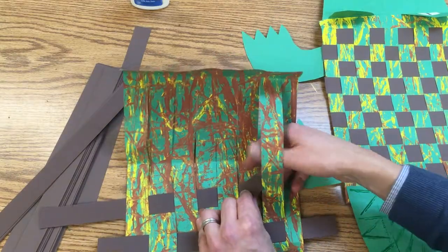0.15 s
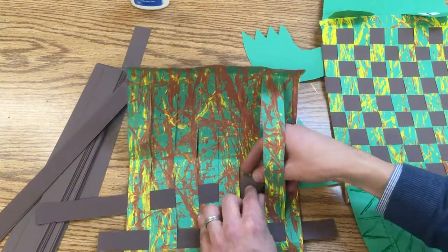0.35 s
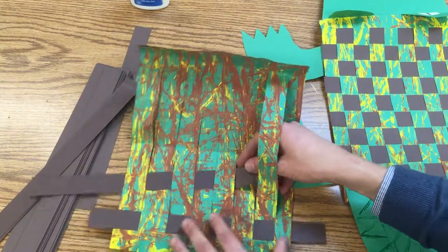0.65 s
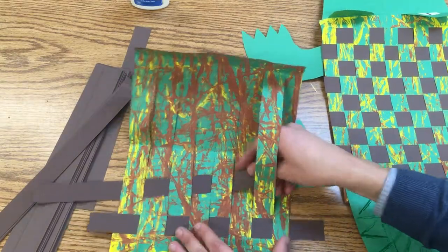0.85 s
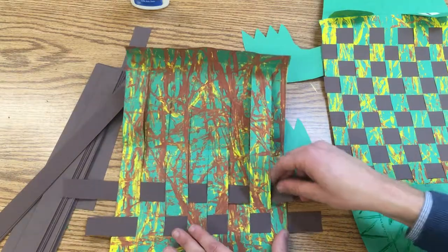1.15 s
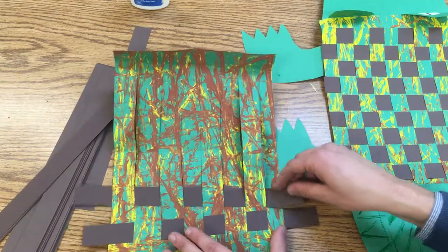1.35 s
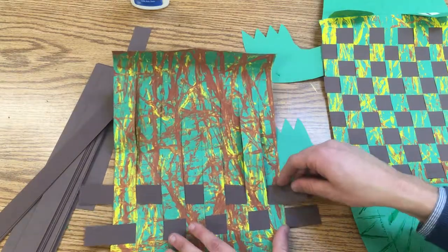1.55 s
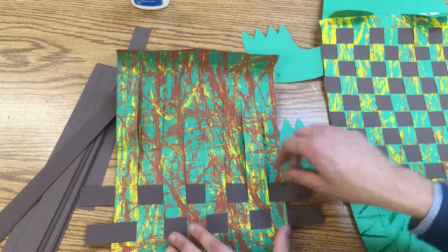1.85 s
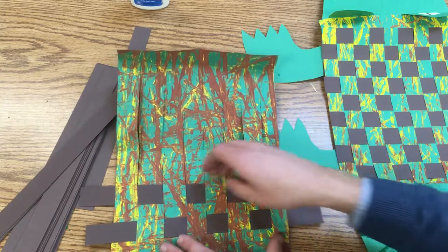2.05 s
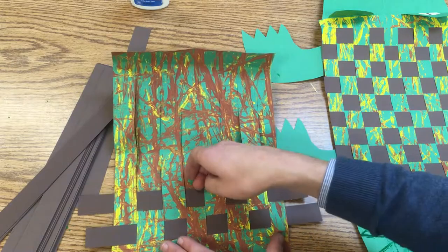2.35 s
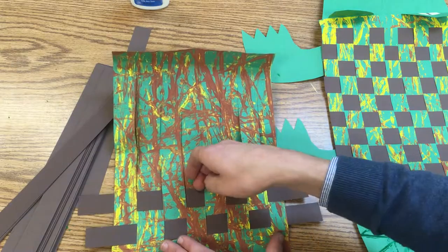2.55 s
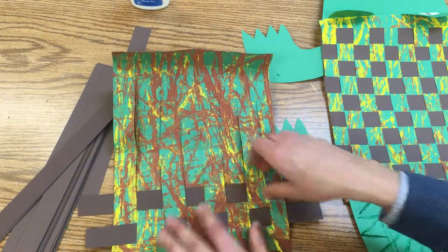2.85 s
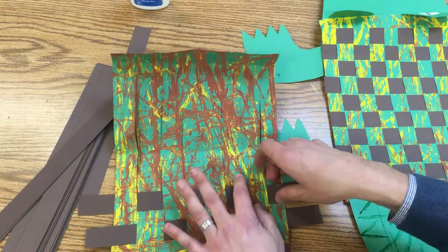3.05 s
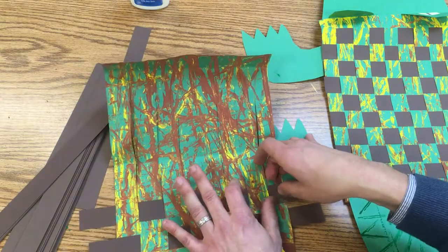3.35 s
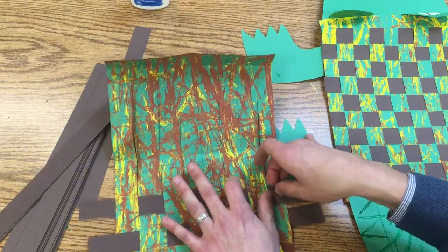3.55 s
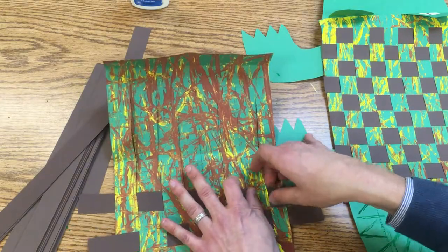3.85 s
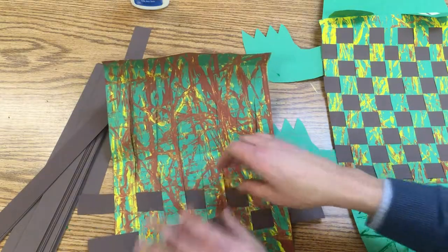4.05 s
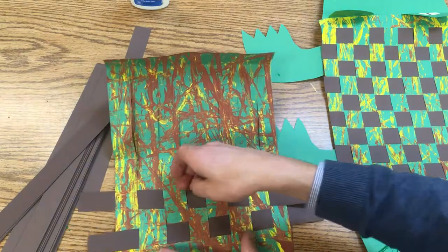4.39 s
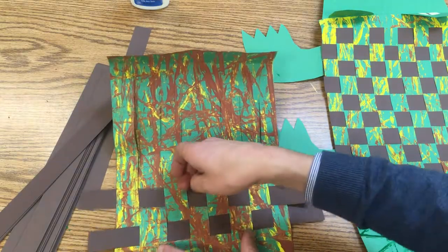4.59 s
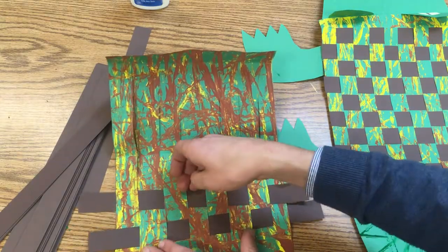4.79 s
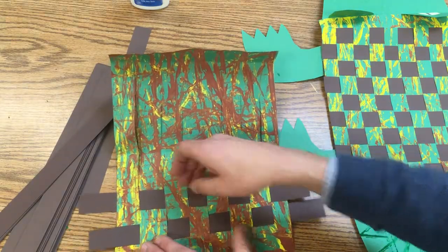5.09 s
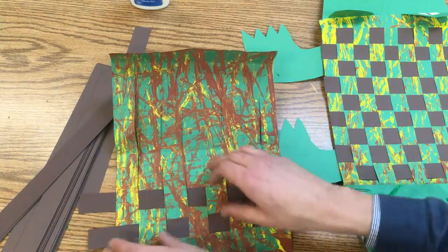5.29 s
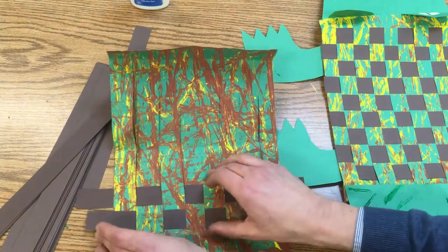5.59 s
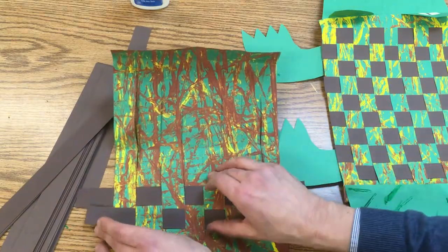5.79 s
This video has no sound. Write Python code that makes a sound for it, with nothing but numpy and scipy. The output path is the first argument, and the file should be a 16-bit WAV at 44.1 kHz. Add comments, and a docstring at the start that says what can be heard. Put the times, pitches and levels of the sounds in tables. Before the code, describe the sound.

A close, dry, mono sound of stiff construction paper being woven on a wooden table in a quiet room. A faint ventilation rumble and slightly wavering low mains hum run throughout. Bright, hissy slides begin at once, with a sharp snap at 0.1 s. Around 0.7 s comes the loudest moment, a tight cluster of crackling snaps and hollow papery taps, followed by strong continuous scraping from about 0.8 to 1.45 s. Shorter rubs follow to 1.8 s, then a lull. Light taps at 2.1 s lead to brief scratchy shuffles until 2.8 s. From 2.9 to 3.9 s softer rubbing returns, with taps and a crisp snap near 3.17 s. After a short pause, taps, ticks and scrapes cluster at 4.2-4.8 s. A snap sounds at 4.9 s, a small tap at 5.15 s, then a snap and longer rustle at 5.5 s, fading into small shuffles and a final tap at 5.9 s.

```python
"""Hands thread strips of stiff paper through a slit sheet on a wooden table, close under a small microphone.
Paper slides on paper: fibres catch and let go in tiny clicks that add up to hiss and a duller sheet scrape.
Creases snap as short noise bursts; taps ring the air pocket under the sheet in a few damped modes.
Below lie a ventilation rumble of shaped noise and duct resonances, and a slightly wavering mains hum."""
import sys
import numpy as np
from scipy import signal
from scipy.fft import rfft, irfft
from scipy.io import wavfile

SR = 44100
rng = np.random.default_rng(int(sys.argv[2]) if len(sys.argv) > 2 else 0)


def to_wav(sig):
    """Store sig (one row per channel, or 1-D mono) as 16-bit WAV at the path in sys.argv[1].

    Samples outside -1..1 are clipped; the rate is SR.
    """
    pcm = np.clip(np.atleast_2d(sig), -1, 1) * 32767
    pcm = np.round(pcm).astype(np.int16)
    wavfile.write(sys.argv[1], SR, pcm.T)  # frames by channels


def field_ratio(decibels):
    """Amplitude ratio for a level in dB (20 dB per decade); scalars and array-likes work."""
    return 10 ** (np.asarray(decibels, dtype=float) / 20)


N = 261504

# bright spectrum of slipping paper fibres: hz, relative_level_db
FIBRE_SPECTRUM = [(2000, -18.5), (3500, -11.5), (5800, 0), (7000, -3), (8800, 2), (12000, 0.5), (16000, -2)]


def rms_one(x):
    """Scale to rms 1."""
    return x / np.sqrt(np.mean(x ** 2) + 1e-20)


def drift(rate_hz):
    """Slow chance wandering, rms 1: noise through two equal one-pole low-passes at rate_hz."""
    r = np.exp(-2 * np.pi * rate_hz / SR)
    noise = rng.standard_normal(N + SR)
    return rms_one(signal.lfilter([1], [1, -2 * r, r * r], noise)[SR:])


def colour(x, spectrum):
    """Shape x by a (Hz, dB) spectrum with a minimum-phase response, so nothing sounds early."""
    size = 8192
    hz = np.maximum(np.fft.rfftfreq(size, 1 / SR), 1)
    hz_points, level_db = np.transpose(spectrum)
    gain = field_ratio(np.interp(np.log(hz), np.log(hz_points), level_db))
    # folding the cepstrum onto positive times makes the phase minimal
    cepstrum = irfft(np.log(gain))
    cepstrum[1:size // 2] *= 2
    cepstrum[size // 2 + 1:] = 0
    response = irfft(np.exp(rfft(cepstrum)))
    response = response / np.sqrt(np.sum(response ** 2))
    return signal.fftconvolve(x, response)[:len(x)]


def resonance(x, hz, width_hz):
    """Two-pole band-pass, gain 1 on top."""
    r = np.exp(-np.pi * width_hz / SR)
    zeros = np.array([1, 0, -1]) * (1 - r * r) / 2
    poles = [1, -2 * r * np.cos(2 * np.pi * hz / SR), r * r]
    return signal.lfilter(zeros, poles, x)


def room_tone():
    """Broad rumble and hiss, duct resonances rung by turbulence, and a slightly wavering mains hum."""
    # room air and microphone hiss: hz, relative_level_db
    air_spectrum = [(20, -12), (40, -5), (60, -7), (130, -4.5), (200, -15.5), (280, -22), (400, -27),
                    (570, -39.5), (900, -23.5), (1200, -44), (1600, -32.5), (3000, -39.5), (5000, -35),
                    (8000, -33.5), (16000, -31.5)]
    # ventilation duct resonances: hz, width_hz, rms_level_db
    duct_modes = [(55.3, 18, -48.5), (79, 32, -51), (159, 30.6, -51.5), (262.4, 14.2, -58),
                  (383.4, 8.1, -66.5)]
    hum_hz, hum_rms_db = 119.8, -46.5
    out = field_ratio(-47.5) * rms_one(colour(rng.standard_normal(N + SR), air_spectrum)[SR:])
    for hz, width_hz, level_db in duct_modes:
        turbulence = rng.standard_normal(N + SR)
        out += field_ratio(level_db) * rms_one(resonance(turbulence, hz, width_hz)[SR:])
    phase = 2 * np.pi * hum_hz * np.arange(N) / SR + 0.38 * drift(1.0)
    hum_level = field_ratio(hum_rms_db + 0.24 * drift(14.0))
    return out + hum_level * np.sqrt(2) * np.sin(phase)


def stroke_levels():
    """Hiss and flex levels in dB: strokes break loose, catch fast, drift in level, let go; powers add."""
    # strokes of paper over paper: start_s, length_s, hiss_start_db, hiss_end_db, flex_over_hiss_db
    strokes = [(0.007, 0.063, -27.5, -34.6, -14), (0.13, 0.045, -32, -41, -17),
               (0.172, 0.13, -36.5, -26, -11), (0.318, 0.15, -37.5, -39.5, -6.5),
               (0.474, 0.12, -43.5, -35, -8.5), (0.601, 0.07, -40.0, -31.5, -6.5),
               (0.678, 0.15, -30, -52, -1), (0.81, 0.064, -41.5, -25.5, -12), (0.881, 0.14, -26, -25.5, -9),
               (1.018, 0.11, -21.0, -27.5, -8), (1.133, 0.048, -34.4, -29, -6),
               (1.198, 0.24, -26.5, -28.5, -10.5), (1.473, 0.059, -48, -56, -5),
               (1.532, 0.13, -27.5, -42, -12), (1.683, 0.067, -35, -42.5, -11.9),
               (1.781, 0.053, -34, -36, -10), (2.142, 0.063, -44.5, -37.5, -6.5),
               (2.215, 0.016, -37, -29.5, -12.5), (2.244, 0.068, -37, -45.5, -4),
               (2.322, 0.033, -57, -22.5, -10.5), (2.37, 0.0074, -24, -59, -8.8),
               (2.394, 0.15, -62, -47, -6.5), (2.6, 0.044, -53, -39, -8.0), (2.634, 0.046, -46, -48, -9),
               (2.703, 0.11, -49.5, -48.5, -8), (2.882, 0.27, -31.5, -63.5, -6.8),
               (3.047, 0.11, -32.5, -42.5, -11.5), (3.177, 0.084, -32.5, -40.5, -11.5),
               (3.273, 0.14, -37.5, -37, -14), (3.424, 0.21, -41.5, -30, -14.0),
               (3.601, 0.079, -30, -38.5, -16), (3.691, 0.285, -42, -44.0, -12),
               (4.254, 0.058, -30.8, -30, -12), (4.323, 0.022, -29.5, -66, -12),
               (4.358, 0.21, -39.5, -46.5, -5.5), (4.605, 0.019, -79, -31.5, -4.3),
               (4.639, 0.052, -25.5, -52, -6.5), (4.689, 0.036, -30, -38, -7.1),
               (4.74, 0.13, -38.5, -44.5, -10.5), (4.913, 0.069, -36, -50, -12.5),
               (5.034, 0.049, -52.5, -32.5, -12), (5.058, 0.097, -68, -34.5, -6.5),
               (5.353, 0.11, -46.5, -42.4, -7), (5.452, 0.24, -30.5, -46.5, -8.5),
               (5.656, 0.11, -48.5, -31.5, -9.6), (5.794, 0.12, -53, -50.5, -9)]
    # brief jerks where the strip sticks and lurches on: start_s, hiss_db, flex_over_hiss_db
    jerks = [(0.095, -31, -9.5), (0.295, -47, 3), (0.453, -39.5, -3.5), (0.591, -39.5, -2.5),
             (0.695, -25, -1), (0.75, -46, -12), (1.428, -27, -13), (2.259, -33.5, -13),
             (2.453, -43, -14.7), (2.95, -35.5, -2.5), (2.98, -54, 7), (3.225, -32, -12.5),
             (3.307, -36, -13), (3.385, -37, -9), (3.495, -37, -21), (3.914, -38, -17), (3.976, -47, -3.5),
             (4.462, -41.5, -10), (4.535, -45, -6), (4.768, -47, -2.8), (5.371, -42, -9.7),
             (5.599, -38.5, -4), (5.694, -37.5, -7), (5.892, -51, -8)]
    jerk_s = 0.011
    catch_db_per_s, release_db_per_s = 1395, 692
    breakaway_s = 0.0085   # the paper holds still until this long before the start time
    t = np.arange(0, N + 64, 32) / SR
    power = 1e-9
    moves = list(strokes) + [(start, jerk_s, db, db, flex_db) for start, db, flex_db in jerks]
    for start, length, start_db, end_db, flex_db in moves:
        end = start + max(length, 1 / SR)
        level_db = np.interp(t, [start, end], [start_db, end_db])
        level_db -= catch_db_per_s * np.maximum(start - t, 0)
        level_db -= release_db_per_s * np.maximum(t - end, 0)
        hiss_and_flex_db = np.maximum(level_db, -150) + [[0], [flex_db]]
        loose = t > start - breakaway_s
        power = power + loose * field_ratio(2 * hiss_and_flex_db)
    return [np.interp(np.arange(N) / SR, t, 10 * np.log10(p)) for p in power]


def friction(clumps, per_s, spread_db):
    """Tiny stick-slip clicks of uneven size, louder within clumps; rms 1."""
    sizes = field_ratio(spread_db * np.minimum(rng.exponential(1, N), 5)) * rng.choice([-1, 1], N)
    caught = rng.random(N) < per_s / SR
    return rms_one(sizes * caught * clumps)


def patchy(x, edges_hz, patchy_db, rate_hz):
    """The bent sheet radiates unevenly: each band swells and fades on its own."""
    out = np.zeros(N)
    for edge in zip(edges_hz, edges_hz[1:]):
        band = signal.butter(1, edge, "band", fs=SR, output="sos")
        out += signal.sosfilt(band, x) * field_ratio(patchy_db * drift(rate_hz))
    return rms_one(out)


def sliding():
    """Fibres give a bright hiss with sparse ticks; the flexing sheet gives a duller scrape."""
    # duller spectrum of the flexing sheet: hz, relative_level_db
    sheet_spectrum = [(210, -38), (350, -20), (512, -16), (1110, -10.5), (1260, -11), (1460, -11),
                      (1660, -8), (3430, -4), (6000, -12), (7800, -10), (13200, -120)]
    # an arched strip traps air and colours the slide for a while: start_s, end_s, hz, top_gain_db
    arches = [(0.253, 0.308, 5100, 5.5), (0.967, 1.196, 3560, 2.5), (1.292, 1.444, 5570, -1),
              (2.167, 2.343, 2860, -3), (2.194, 2.27, 10800, 8), (2.705, 2.837, 2860, 10),
              (2.864, 2.924, 2620, 7.5), (2.872, 2.898, 5400, 10), (4.22, 4.322, 2500, 9.5),
              (4.257, 4.433, 8400, 3), (4.39, 4.524, 2730, 7), (4.674, 4.73, 3020, 13),
              (5.453, 5.598, 2900, 1), (0.84, 1.175, 4900, 1.5), (2.87, 2.893, 4000, 1)]
    hiss_db, flex_db = stroke_levels()
    # grip varies along the fibres and with the hand
    clumps = field_ratio(1.5 * drift(97) + 1.1 * drift(30))
    ticks = friction(clumps, 250, spread_db=2.5)
    fibres = friction(clumps, 16000, spread_db=2.5) + field_ratio(-11) * ticks
    hiss_edges_hz = np.geomspace(3000, 19000, num=9)
    hiss = patchy(colour(fibres, FIBRE_SPECTRUM), hiss_edges_hz, patchy_db=1.2, rate_hz=12)
    scrape = friction(clumps, 5000, spread_db=3.0)
    flex_edges_hz = np.geomspace(300, 7000, num=10)
    flex = patchy(colour(scrape, sheet_spectrum), flex_edges_hz, patchy_db=1.8, rate_hz=12)
    slide = field_ratio(hiss_db) * hiss + field_ratio(flex_db) * flex
    rung = np.zeros(N)
    for start, end, hz, gain_db in arches:
        span = slice(round(start * SR), round(end * SR))
        opening = np.sqrt(np.hanning(span.stop - span.start))
        rung[span] += field_ratio(gain_db) * opening * resonance(slide[span], hz, 0.14 * hz)
    return slide + rung


def taps():
    """A push rings the air pocket under the sheet in a few damped modes, over a dull papery rattle."""
    # fingertips and strip ends tapping the sheet against the table: start_s, peak_db, pitch_hz
    tap_events = [(0.098, -35, 3670), (0.689, -15, 3110), (0.707, -21, 2760), (0.738, -26, 2600),
                  (0.752, -21.5, 2940), (2.081, -39, 2360), (2.093, -30.5, 2500), (2.105, -34, 2300),
                  (2.119, -32.5, 2060), (2.126, -36, 2800), (2.489, -30.5, 2050), (2.597, -31.5, 1830),
                  (2.876, -30, 2570), (2.95, -24, 2650), (2.982, -29.5, 1760), (3.16, -33, 1840),
                  (3.175, -29.5, 1540), (3.838, -33.5, 3380), (4.2, -31.5, 1340), (4.214, -29, 1710),
                  (4.232, -34, 1820), (4.269, -24, 2550), (4.533, -33.5, 1670), (5.153, -28, 3880),
                  (5.895, -30, 1870), (5.901, -34, 1730)]
    # modes of the air pocket: multiple_of_pitch, relative_level_db
    pocket_modes = [(.55, -8), (1, 0), (1.93, -8), (3.1, -16)]
    ring_cycles = 48   # cycles of the pitch in which the modes fall by 60 dB
    rattle_t60_s, attack_s = 0.014, 0.0001
    out = np.zeros(N)
    t = np.arange(SR // 10) / SR
    rattles = rng.standard_normal((len(tap_events), len(t)))
    for (start, peak_db, hz), rattle in zip(tap_events, rattles):
        at = round(start * SR)
        modes = np.zeros(len(t))
        for multiple, mode_db in pocket_modes:
            decay = field_ratio(mode_db - 60 * t * hz / ring_cycles)
            modes += decay * np.sin(2 * np.pi * multiple * hz * t)
        band = signal.butter(2, [0.3 * hz, 1.4 * hz], "band", fs=SR, output="sos")
        dull = rms_one(signal.sosfilt(band, rattle)) * field_ratio(-60 * t / rattle_t60_s)
        tap = (0.6 * modes + 0.45 * dull) * (1 - np.exp(-t / attack_s))
        out[at:at + len(t)] += field_ratio(peak_db) * (tap / np.abs(tap).max())[:N - at]
    return out


def snaps():
    """Each snap is a brief burst of fibre slips that peaks at once and dies."""
    # creases snapping and edges flicking past: start_s, peak_db
    snap_events = [(0.1054, -7), (0.1715, -19), (0.6735, -9.5), (0.6864, -17), (0.6905, -6), (0.6974, -28),
                   (0.7014, -1.5), (0.7084, -6.5), (0.7518, -15), (0.9896, -19), (1.0215, -21),
                   (1.1558, -16), (1.1927, -17), (1.726, -16), (1.7818, -15), (2.149, -25), (2.4894, -25.5),
                   (2.6354, -20.5), (2.877, -20), (2.9815, -21), (3.1014, -24), (3.174, -12.5),
                   (3.1815, -18), (3.186, -17), (3.7474, -26), (3.8044, -25), (3.8222, -35), (3.8372, -24),
                   (4.136, -30.5), (4.2444, -27), (4.2543, -16), (4.3224, -14), (4.3555, -29),
                   (4.3735, -18.5), (4.3939, -20), (4.4164, -27), (4.4826, -20), (4.5604, -26),
                   (4.8374, -27), (4.9161, -13), (5.0383, -28), (5.4767, -12), (5.694, -21), (5.7463, -18),
                   (5.8025, -29), (5.8795, -32), (5.8945, -20)]
    attack_s, t60_s = 0.00013, 0.007
    out = np.zeros(N)
    t = np.arange(SR // 50) / SR
    envelope = (1 - np.exp(-t / attack_s)) * field_ratio(-60 * t / t60_s)
    slips = rng.standard_normal((len(snap_events), len(t)))
    for (start, peak_db), slip in zip(snap_events, slips):
        at = round(start * SR)
        burst = colour(slip * envelope, FIBRE_SPECTRUM)
        out[at:at + len(t)] += field_ratio(peak_db) * (burst / np.abs(burst).max())[:N - at]
    return out


def scene():
    """Paper on the table over the room tone, in one channel."""
    return (room_tone() + sliding() + taps() + snaps())[None]


def band_limit(x):
    """A steep low-pass at the top of the band."""
    return signal.sosfilt(signal.butter(12, 16970, fs=SR, output="sos"), x)


def record(dry):
    """The small microphone loses deep bass, its housing cuts narrow treble dips, the top ends steeply."""
    # dips from the microphone housing: hz, width_hz, depth (0-1)
    housing_dips = [(4990, 640, 0.42), (8000, 780, 0.27), (10560, 620, 0.58)]
    bass_cut_hz, treble_cut_hz = 42, 15780
    bass_cut = signal.butter(2, bass_cut_hz, "high", fs=SR, output="sos")
    heard = signal.sosfilt(bass_cut, dry)
    heard = heard - sum(depth * resonance(heard, hz, width_hz) for hz, width_hz, depth in housing_dips)
    treble_cut = signal.ellip(12, 0.3, 50, treble_cut_hz, fs=SR, output="sos")
    heard = signal.sosfilt(treble_cut, heard)
    return band_limit(heard)


dry = scene()
out = record(dry)
to_wav(out)
```